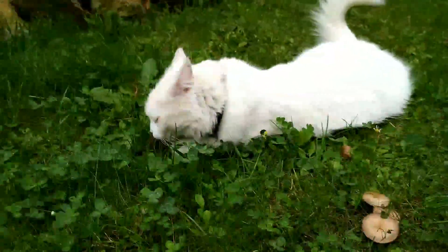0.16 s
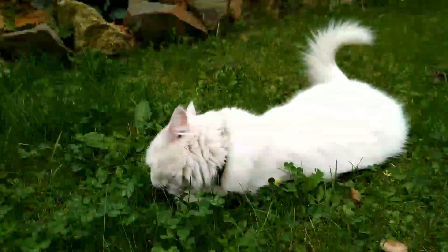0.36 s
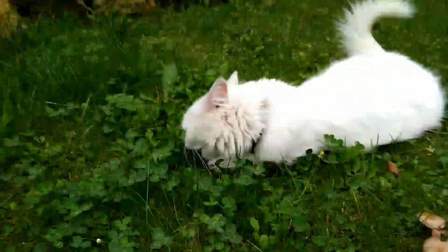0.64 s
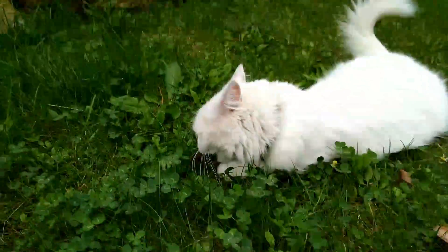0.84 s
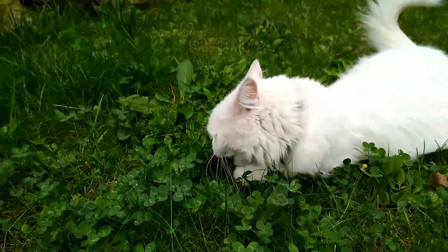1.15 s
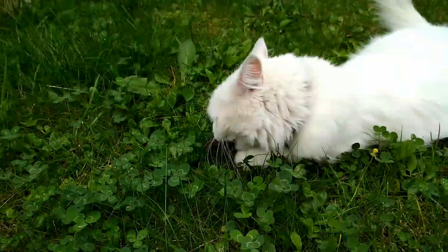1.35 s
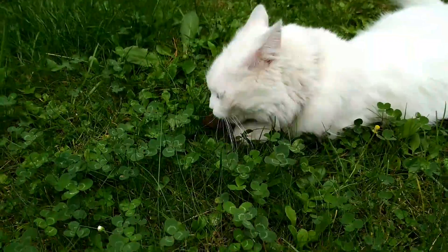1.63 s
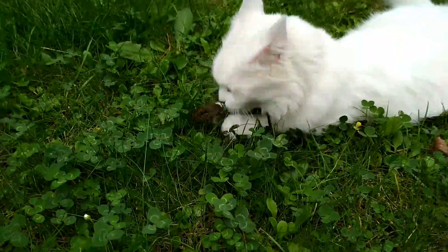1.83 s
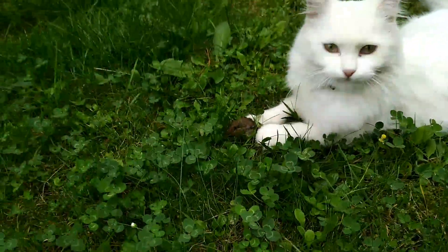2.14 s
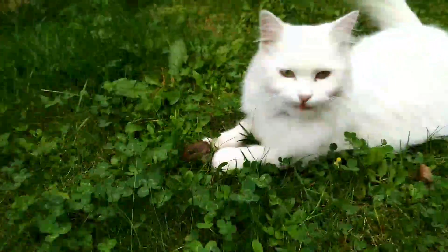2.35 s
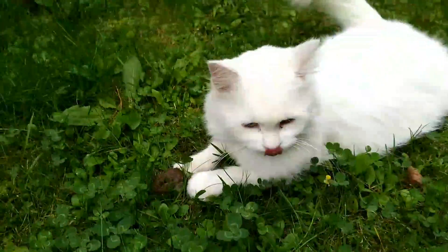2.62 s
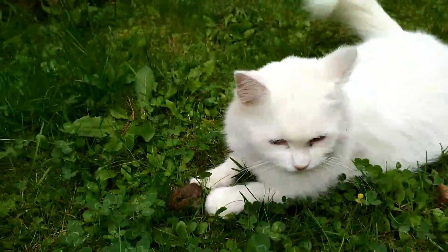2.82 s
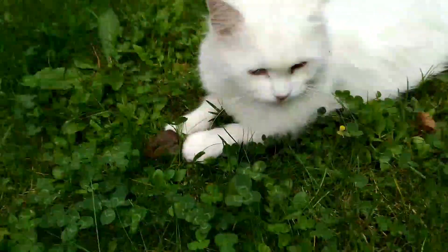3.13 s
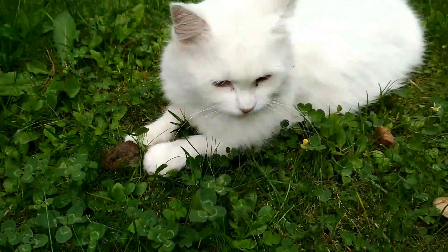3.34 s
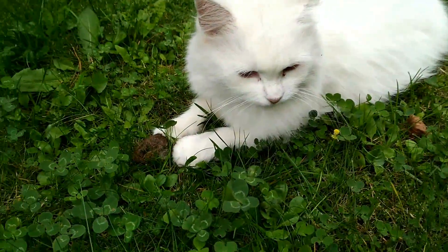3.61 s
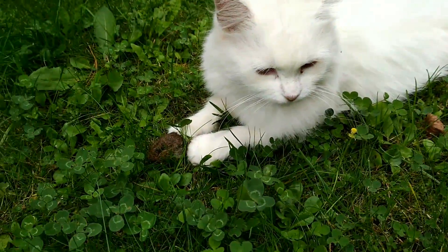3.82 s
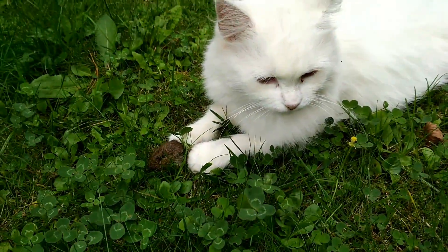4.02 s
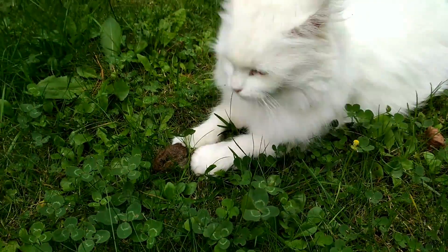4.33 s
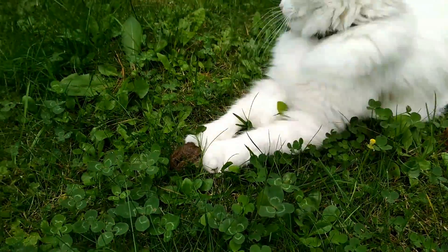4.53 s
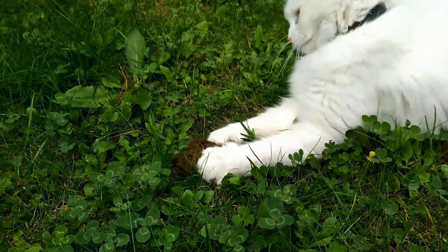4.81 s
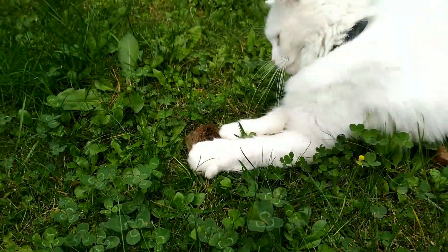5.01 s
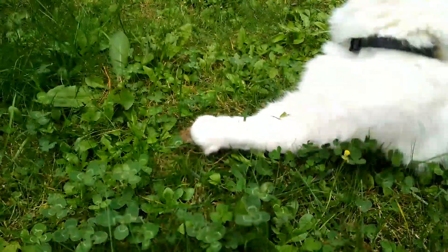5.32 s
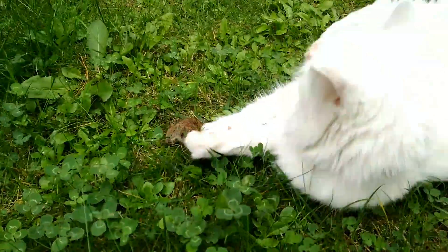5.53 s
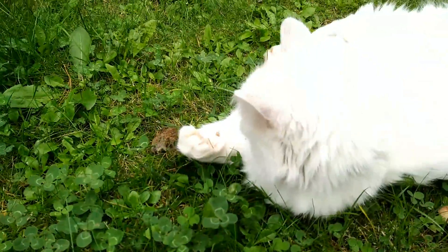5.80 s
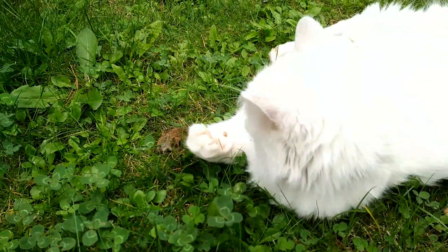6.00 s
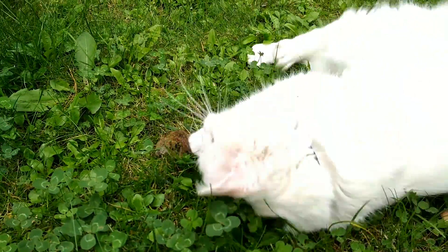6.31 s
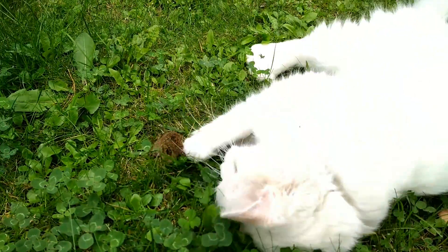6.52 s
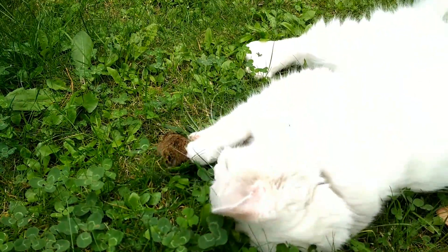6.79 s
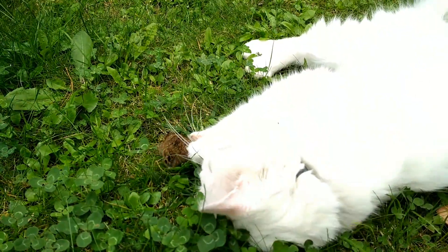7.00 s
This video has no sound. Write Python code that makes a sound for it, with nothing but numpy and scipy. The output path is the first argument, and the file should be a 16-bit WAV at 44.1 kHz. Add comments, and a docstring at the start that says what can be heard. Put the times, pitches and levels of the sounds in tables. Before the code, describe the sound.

A quiet garden with a very faint low rumble and thin airy hiss. A dog some way off barks five times, short, hoarse and abruptly cut, at about 0.4, 1.8, 2.6, 3.8 and 4.9 seconds, the later ones slightly softer; each slaps back from nearby walls and foliage. Close up, crisp brushing of grass swells at 0.6 to 1 second and again at 2.2, with faint short strokes elsewhere. Tiny, very high metal clinks, as from a collar, sound brightest at 0.67, then at 1.0, 1.35, 2.36 and 2.7, some with dry snaps; another snap comes at 4.5. A much farther dog gives dull, smeared hoots, one at 0.6 and a scattered run from 3.1 to 4.7. Soft, barely audible low bumps occur at the start, near 1 second, and around 5, 6.1 and 6.7. After 5 seconds it settles into faint rustles until about 7.

```python
"""A dog some way off across a garden lawn gives five short, hoarse barks: pulsing vocal folds and air
shaped by a throat, thrown back by nearby walls and leaves. Another dog, far away, answers in dull hoots.
Close by, something brushes in strokes of filtered noise, a small metal fitting clinks in decaying modes
and dry noise bursts snap. Under it lie a low outdoor rumble, a few soft bumps and a faint high hiss."""
import sys
import numpy as np
from scipy import signal
from scipy.fft import rfft, irfft, next_fast_len
from scipy.io import wavfile
from scipy.ndimage import uniform_filter1d, map_coordinates

SR = 44100
rng = np.random.default_rng(int(sys.argv[2]) if len(sys.argv) > 2 else 0)


def int16_out(signal):
    """Quantize to a 16-bit WAV file."""
    q = np.round(np.clip(np.atleast_2d(signal).T, -1, 1) * 32767)
    wavfile.write(sys.argv[1], SR, q.astype(np.int16))


N = 315315  # length in samples


def amp(db):
    """Decibels to gain."""
    return 10 ** (np.asarray(db) / 20)


def unit(x):
    """Scale to rms 1."""
    return x / np.sqrt(np.mean(x ** 2) + 1e-20)


def along(points, hz):
    """Read a curve of (Hz, value) points on a log frequency axis."""
    point_hz, values = np.transpose(points)
    return np.interp(np.log(hz + 1), np.log(point_hz + 1), values)


def filtered(x, response):
    """Multiply the spectrum of x by a response of frequency."""
    n = x.shape[-1]
    padded = next_fast_len(n + 4096)
    spectrum = rfft(x, padded) * response(np.fft.rfftfreq(padded, 1 / SR))
    return irfft(spectrum, padded)[..., :n]


def noise(spectrum, n, alike):
    """Coloured stereo noise of rms 1 with a given left-right correlation."""
    middle, side = filtered(rng.standard_normal((2, n)), lambda hz: amp(along(spectrum, hz)))
    turn = np.arccos(np.clip(alike, -1, 1)) / 2
    return unit(np.cos(turn) * middle + np.sin(turn) * np.array([side, -side]))


def wobble(rate, n):
    """A smooth random curve with rate knots a second."""
    knots = rng.standard_normal(int(n * rate / SR) + 4)
    return map_coordinates(knots, [np.arange(n) * rate / SR])


def patchy(x, depth_db, size=(3, 9)):
    """The colour of a noise shifts at random, in small patches of time and frequency."""
    z = signal.stft(x, nperseg=512)[2]
    field = uniform_filter1d(rng.standard_normal(z.shape[1:]), size[0], 0)
    field = uniform_filter1d(field, size[1], 1)
    shifted = signal.istft(z * amp(depth_db * unit(field)), nperseg=512)[1]
    return unit(shifted[:, :x.shape[-1]])


def panned(left_minus_right_db):
    """Left and right gains of mean power 1."""
    return unit(amp([[left_minus_right_db / 2], [-left_minus_right_db / 2]]))


def add(track, start_s, x):
    """Mix x into the track at start_s, trimmed to fit."""
    start = round(start_s * SR)
    x = x[..., max(-start, 0):max(N - start, 0)]
    start = max(start, 0)
    track[..., start:start + x.shape[-1]] += x


def reverb(x, t60s):
    """A diffuse stereo tail, about a second of noise in which each frequency dies at its own speed."""
    hz, t, z = signal.stft(rng.standard_normal((2, SR)), SR, nperseg=256)
    fade = amp(-60 * t / along(t60s, hz)[:, None])
    tail = signal.istft(z * fade, SR, nperseg=256)[1]
    return signal.fftconvolve(np.atleast_2d(x), tail / np.linalg.norm(tail[0]), axes=1)[:, :N]


# Loudness contour of one bark: share_of_bark [0-1], level_db
BARK_SWELL = [(0, -11.5), (.2, -13), (.55, -1.5), (.9, -2.5), (1, -3)]
# The dog's throat, apart from the moving mouth resonance: freq_hz, level_db
THROAT_TONE = [(200, -25), (340, -27.5), (480, -21), (610, -2), (690, 1.5), (810, -0.5), (970, -5.5),
               (1350, -6), (1680, -11), (1900, -21), (2300, -31), (2750, -27.5), (3600, -51.5), (7000, -28),
               (13000, -42)]
# Mouth resonance at the start and end of a bark: share of the bark's own mouth_hz [ratio]
MOUTH_TRAVEL = (.8, 1.05)


def bark(length, pitches, rough, mouth_hz, mouth_db=6, flutter_db=1.83, release_s=0.011, doubling=0.38):
    """Unsteady vocal folds and pulsing air sound through the throat; the jaw opens, then snaps them off."""
    t = np.arange(int(.16 * SR)) / SR
    n = len(t)
    u = t / length  # share of the bark elapsed

    waver = (.015 + .09 * rough) * wobble(85, n) + .05 * rough * wobble(400, n)
    pitch_hz = np.interp(u, [0, .68, 1], pitches) * (1 + waver)
    phase = 2 * np.pi * np.cumsum(pitch_hz) / SR
    folds = unit(sum(np.cos(k * phase - 0.421 * k * k) for k in range(1, 16)))
    # a hoarse voice alternates strong and weak pulses
    folds = folds * (1 + doubling * rough * np.cos(phase / 2))
    air = unit(rng.standard_normal(n) * (1 + np.cos(phase)))

    mouths = mouth_hz * np.array(MOUTH_TRAVEL)[:, None]
    opened = np.clip(1.3 * u, 0, 1)

    def throat(hz):
        return amp(along(THROAT_TONE, hz) + mouth_db / (1 + ((hz - mouths) / 150) ** 2))

    def shaped(x):
        # crossfade from the starting to the final mouth shape
        return unit((filtered(x, throat) * [1 - opened, opened]).sum(0))

    air_share = np.clip(rough * (1.3 - u), .02, .95)  # most air before the folds settle
    voice = np.sqrt(1 - air_share) * shaped(folds) + np.sqrt(air_share) * shaped(air)

    # the treble comes only as the jaw opens
    dull = filtered(voice, lambda hz: 1 / (1 + (hz / 2150) ** 12))
    voice = dull + (voice - dull) * np.clip(3.3 * u - .8, 0, 1.2)

    # the part below about 820 Hz starts weaker and fills in by mid-bark
    low = filtered(voice, lambda hz: 1 / (1 + (hz / 820) ** 8))
    voice = voice - .45 * np.clip(1 - 2 * u, 0, 1) * low

    swell_db = np.interp(u, *np.transpose(BARK_SWELL))
    release_db = -20 * np.maximum(t - length, 0) / release_s
    onset = np.minimum(t / .014, 1)
    return voice * amp(swell_db + release_db + flutter_db * wobble(150, n)) * onset


# The five barks: start_s, level_db, top_pitch_hz (before waver), opening_pitch [share of the top],
# roughness [0-1], mouth_hz (before the jaw moves it)
DOG_BARKS = [(.394, -24, 336.3, .97, .25, 1430), (1.783, -24.5, 354.6, .75, 0.4, 1350),
             (2.637, -27.5, 350.1, .82, .45, 1240), (3.762, -27.5, 338.2, .82, .55, 1270),
             (4.887, -28, 344, .9, 0.5, 1450)]
# Wall echoes: delay_s, level_db, dullness_db_per_octave (from 700 to 2800 Hz; negative brightens)
WALL_ECHOES = [(.012, -10.5, -1.5), (.027, -10, -1), (.046, -10.5, 1.5), (.062, -14, 3.5), (.082, -9, 9.5),
               (.115, -27.5, -5.5)]
# Colour of the scatter off the foliage: freq_hz, level_db
LEAF_TONE = [(500, -4.5), (1500, -19.5), (2200, 2), (4000, 3), (9000, -4.5)]
# Decay of the leaf scatter: freq_hz, t60_s
LEAF_DECAY = [(500, 0.23), (2000, 0.6), (7000, 1)]
# Decay of the garden wash: freq_hz, t60_s
GARDEN_DECAY = [(200, 5.4), (800, 1.72), (2000, 1.34), (6000, 0.61), (14000, 0.48)]
BARK_S, CLOSING_SHARE = 0.0862, .93  # bark length; closing pitch as a share of the top


def dog(lead_s=.00007, garden_db=-25):
    """Barks arrive directly, left ear first, then off walls, scattered by foliage and as a faint wash."""
    direct = np.zeros(N)
    for start_s, level_db, top_hz, opening, rough, mouth_hz in DOG_BARKS:
        pitches = top_hz * np.array([opening, 1, CLOSING_SHARE])
        add(direct, start_s, amp(level_db) * bark(BARK_S, pitches, rough, mouth_hz))

    # opposite half-lead shifts at the two ears
    heard = filtered(direct, lambda hz: np.exp(1j * np.pi * hz * lead_s * np.array([[1], [-1]])))
    for delay_s, level_db, dull_db in WALL_ECHOES:
        echo = filtered(direct, lambda hz: amp(
            level_db - dull_db * np.clip(np.log2(hz / 700 + 1e-6), 0, 2)))
        for ear in heard:
            add(ear, delay_s + rng.uniform(-.0004, .0004), echo)

    scatter = reverb(filtered(direct, lambda hz: amp(along(LEAF_TONE, hz))), LEAF_DECAY)
    return heard + scatter + amp(garden_db) * reverb(direct, GARDEN_DECAY)


# The far dog: start_s, pitch_hz (before its arch and wobble), level_db (before the direct and wash gains)
DISTANT_BARKS = [(0.561, 475, -57.5), (3.13, 388, -62), (3.27, 312.7, -69.5), (3.618, 412.5, -62),
                 (4.051, 451.7, -55), (4.322, 486, -58), (4.67, 539, -60)]
FAR_BARK_S = 0.119  # length of each hoot


def far_dog(overtone_db=-12, direct_db=-4, wash_db=-3):
    """Distance leaves only a smeared, dull hoot of each bark: two partials with an arched pitch."""
    hoots = np.zeros(N)
    n = int(FAR_BARK_S * SR)
    arch = np.sin(np.pi * np.arange(n) / n)
    for start_s, pitch_hz, level_db in DISTANT_BARKS:
        glide_hz = pitch_hz * (.92 + 0.097 * arch + .11 * wobble(160, n))
        phase = 2 * np.pi * np.cumsum(glide_hz) / SR
        hoot = unit(np.sin(phase) + amp(overtone_db) * np.sin(2 * phase))
        add(hoots, start_s, amp(level_db) * arch * hoot)
    return amp(direct_db) * hoots + amp(wash_db) * reverb(hoots, [(300, 0.97), (1200, 0.32)])


# Brushing strokes: start_s, length_s, level_db, scrape_db (against the hiss), left_minus_right_db,
# brightness_db (tilts the hiss about 11500 Hz; positive lifts the top, negative the bottom)
BRUSH_STROKES = [(0, .11, -39.5, -13, -3.5, 13.5), (.46, .11, -46.5, -26, -5, -4.5),
                 (.635, 0.27, -33.5, -17.5, 3, 12), (0.764, 0.16, -17.5, -20.5, 3, 4.5),
                 (.935, .045, -24.5, -18, 2, 2.5), (2.195, 0.14, -22.5, -22, -4.5, 0.5),
                 (2.375, .09, -45, -29, -7.5, -5), (2.72, .085, -43.5, -17, -1, 4),
                 (2.839, 0.26, -66, 6.5, -3.5, 2), (4.21, .07, -53.5, -4.5, -8.5, 5),
                 (4.527, .095, -49, -32.5, -15.5, -4.5), (4.836, 0.061, -48, -19.5, -18.5, 2),
                 (5.027, 0.048, -39, -24, -6, 9.5), (5.279, .12, -49.5, -21, -9.5, 3),
                 (5.515, 0.14, -39, -40.5, 10.5, -1.5), (6.264, 0.15, -42, -32, -13, 0.5),
                 (6.427, 0.19, -53.5, -31, -1.5, -4.5), (6.801, .2, -63, -20.5, -6, -3)]
# Pressure through a stroke: share_of_stroke [0-1], level_db
STROKE_PRESSURE = [(0, -2.5), (.33, -2.5), (.6, -2), (1, -12.5)]
# Thin hiss colour, also used for metal chatter and the high background: freq_hz, level_db
HISS_TONE = [(2500, -21), (4300, -51), (5300, -13), (6500, -14.5), (7600, -15), (9000, -8.5), (10500, -5),
             (11700, 1.5), (13300, 0), (15600, -6)]
# Duller scrape colour: freq_hz, level_db
SCRAPE_TONE = [(150, -25), (450, -13), (800, -3), (1150, -4.5), (1800, -8), (2700, -8), (4000, -12),
               (7000, -14.5)]
TOUCH_DB_PER_S, LIFT_DB_PER_S = 512.5, 268  # how fast a stroke sets in and dies away
CRACKLES_PER_S, CRACKLE_DB = 100, -12.5  # mean rate of tiny catches; their level against the rasp


def brushing(grain_db=1.45, wash_db=-13):
    """Strokes of fine friction hiss, with a duller, crackling scrape that carries into the garden."""
    hisses, scrapes = np.zeros((2, 2, N))
    t = np.arange(-SR // 10, SR // 2) / SR  # starts before the touch, to let it fade in
    n = len(t)
    for start_s, length_s, level_db, scrape_db, pan_db, bright_db in BRUSH_STROKES:
        press_db = np.interp(t / length_s, *np.transpose(STROKE_PRESSURE))
        touch_db = TOUCH_DB_PER_S * np.minimum(t, 0)
        lift_db = -LIFT_DB_PER_S * np.maximum(t - length_s, 0)
        pressure = amp(press_db + touch_db + lift_db + grain_db * wobble(170, n))

        hiss = filtered(noise(HISS_TONE, n, 0.11),
                        lambda hz: amp(bright_db * np.clip((hz - 11500) / 3000, -1, 1)))
        hiss = patchy(hiss, depth_db=5.5)
        add(hisses, start_s + t[0], amp(level_db) * pressure * panned(pan_db) * hiss)

        catches = (rng.random(n) < CRACKLES_PER_S / SR) * rng.standard_normal((2, n))
        crackle = unit(filtered(catches, lambda hz: amp(along(SCRAPE_TONE, hz))))
        rasp = patchy(noise(SCRAPE_TONE, n, .25), depth_db=2)
        scrape = rasp + amp(CRACKLE_DB) * crackle
        surges_db = 2.2 * wobble(60, n)
        add(scrapes, start_s + t[0], pressure * amp(level_db + scrape_db + surges_db) * scrape)
    return hisses + scrapes + amp(wash_db) * reverb(scrapes, GARDEN_DECAY)


# Clinks: start_s, level_db (before the ring and chatter gains), left_minus_right_db,
# low_ring_db (control for modes below 11000 Hz, offset and scaled when played)
FITTING_CLINKS = [(0.084, -31, 3, -28), (.6455, -27, 10, -31), (.669, -3.5, 9, -10), (0.9871, -13, -7, -18),
                  (1.0255, -11.5, -1.5, -39), (1.3435, -7.5, 0.5, -27), (1.8668, -27, -4, -3.5),
                  (2.357, -5.5, -7.5, -13), (2.5719, -19, 0, -47), (2.703, -5.5, -2.5, -6.5),
                  (4.4918, -23.5, 0.5, -29.5), (5.0909, -33.5, -8, -44)]
# Modes of the metal fitting: freq_hz, level_db (relative, before scatter), t60_s
METAL_MODES = [(8270, -14.5, 0.023), (9150, -27, 0.038), (10750, -27, 0.026), (12100, -5, 0.033),
               (13100, -15.5, .02), (13340, -8, .016), (13900, 2, 0.028), (14060, 1, 0.029),
               (14180, -2.5, .02)]
REBOUND_S, REBOUND_DB = .0095, -8.5  # the fitting strikes once more, this much later and weaker


def clinks(ring_db=7.02, chatter_db=-6, chatter_t60=0.0069, rattle_db=-30.02, rattle_t60=0.19, attack_s=0.0018):
    """Each contact and rebound shares its energy anew among the metal's modes; it chatters, then fizzes."""
    out = np.zeros((2, N))
    t = np.arange(SR // 5) / SR
    mode_hz, mode_db, mode_t60 = np.transpose(METAL_MODES)[:, :, None]
    for start_s, level_db, pan_db, low_db in FITTING_CLINKS:
        for delay_s, loss_db in (0, 0), (REBOUND_S, REBOUND_DB):
            scatter_db = rng.normal(0, 3, (2, len(METAL_MODES), 1))
            low_ring_db = (mode_hz < 11000) * (low_db + 10.5) * 0.74
            strength = amp(mode_db + scatter_db + low_ring_db)
            strength = strength / np.linalg.norm(strength)
            # phase in cycles, a little different at each ear
            phase = rng.random(mode_hz.shape) + rng.normal(0, 0.32, strength.shape)
            modes = strength * amp(-60 * t / mode_t60) * np.sin(2 * np.pi * (mode_hz * t + phase))

            chatter_fade = amp(chatter_db - 60 * t / chatter_t60)
            rattle_fade = amp(rattle_db - 60 * t / rattle_t60)
            chatter = (chatter_fade + rattle_fade) * noise(HISS_TONE, len(t), 0.21)
            contact = (amp(ring_db) * modes.sum(1) + chatter) * (1 - np.exp(-t / attack_s))
            add(out, start_s + delay_s, amp(level_db + loss_db) * panned(pan_db) * contact)
    return out


# Dry snaps: start_s, level_db (before the snap gain), left_minus_right_db,
# knock_db (against the crack, before the body gain)
DRY_SNAPS = [(.3601, -36, -3, -9.5), (1.3433, -30, 4, -7.5), (2.3575, -25.5, -12.5, -36),
             (2.7035, -14.5, 9, -4), (3.1303, -34.5, -21, -13), (4.5271, -18.5, -18.5, -27),
             (4.8322, -36.5, -1, -18), (6.9002, -44, -4.5, -11), (7.0229, -44.5, -15.5, -25)]
# Colour of the crack: freq_hz, level_db
CRACK_TONE = [(1000, -34), (4000, -14), (6200, 0.5), (9000, 3), (12000, 11), (16000, -6)]
# Colour of the duller knock: freq_hz, level_db
KNOCK_TONE = [(200, -16.5), (700, -25), (2300, 5), (2900, -9), (4300, -6.5), (7000, -33)]


def snaps(t60=0.017, snap_db=1, body_db=-2, attack_s=0.0012):
    """Fast-decaying noise gives short dry cracks without a ring, some with a duller knock."""
    out = np.zeros((2, N))
    t = np.arange(SR // 20) / SR
    for start_s, level_db, pan_db, knock_db in DRY_SNAPS:
        knock = amp(knock_db + body_db) * noise(KNOCK_TONE, len(t), 0.38)
        crack = noise(CRACK_TONE, len(t), 0.043) + knock
        envelope = amp(level_db + snap_db - 60 * t / t60) * (1 - np.exp(-t / attack_s))
        add(out, start_s, envelope * panned(pan_db) * crack)
    return out


# Soft low bumps: start_s, length_s, pitch_hz (centre of the noise band), level_db
SOFT_BUMPS = [(0.121, 0.32, 71, -47), (1.002, 0.052, 253, -52.5), (5.039, 0.03, 61, -42),
              (6.092, 0.036, 65, -46), (6.682, 0.054, 57, -47.5)]


def bumps(width=0.36):
    """Narrow bands of low noise swell and fade as soft, toneless thuds."""
    out = np.zeros(N)
    for start_s, length_s, pitch_hz, level_db in SOFT_BUMPS:
        n = int(length_s * SR)
        thud = filtered(rng.standard_normal(SR),
                        lambda hz: np.exp(-(np.log((hz + 1) / pitch_hz) / width) ** 2))[:n]
        add(out, start_s, amp(level_db) * np.hanning(n) * unit(thud))
    return out


# Colour of the distant rumble: freq_hz, level_db
RUMBLE_TONE = [(15, -10.5), (30, -2.5), (60, 0.5), (85, -4), (120, -7.5), (180, -14.5), (260, -19),
               (500, -29), (1000, -74)]
# Colour of the air noise: freq_hz, level_db
AIR_TONE = [(150, -35), (300, -8.5), (500, -3), (800, -9), (1500, -13.5), (3000, -16), (4500, -18),
            (6500, -22), (9000, -22), (14000, -51.5)]
# Level of the high hiss over time: time_s, level_db
HIGH_HISS_LEVEL = [(0, -58), (1.101, -61.5), (1.6, -62.5), (2.901, -56.5), (3.7, -68.5), (7.15, -69)]


def outdoors(rumble_db=-57, air_db=-70):
    """A wavering distant rumble, alike on both sides, under soft air noise and a thin, patchy hiss."""
    rumble = amp(rumble_db + 1.3 * wobble(13, N)) * noise(RUMBLE_TONE, N, 0.96)
    air = amp(air_db + 0.86 * wobble(35, N)) * noise(AIR_TONE, N, 0.13)
    high_db = np.interp(np.arange(N) / SR, *np.transpose(HIGH_HISS_LEVEL))
    high_hiss = patchy(noise(HISS_TONE, N, 0.025), depth_db=4.0)
    return rumble + air + amp(high_db + 0.42 * wobble(21, N)) * high_hiss


# Decay of the short reflections around the close sounds: freq_hz, t60_s
NEARBY_DECAY = [(200, 0.136), (14000, 0.7)]


def scene(nearby_db=-17, garden_db=-34):
    """The dogs, the close sounds with their reflections, and the open air."""
    close = brushing() + snaps()
    close = close + amp(nearby_db) * reverb(close, NEARBY_DECAY) + amp(garden_db) * reverb(close, GARDEN_DECAY)
    return dog() + far_dog() + close + clinks() + bumps() + outdoors()


def record(dry, top_hz=15900):
    """A sharp band limit removes everything from top_hz upward."""
    return filtered(dry, lambda hz: hz < top_hz)


dry = scene()
out = record(dry)
int16_out(out)
```